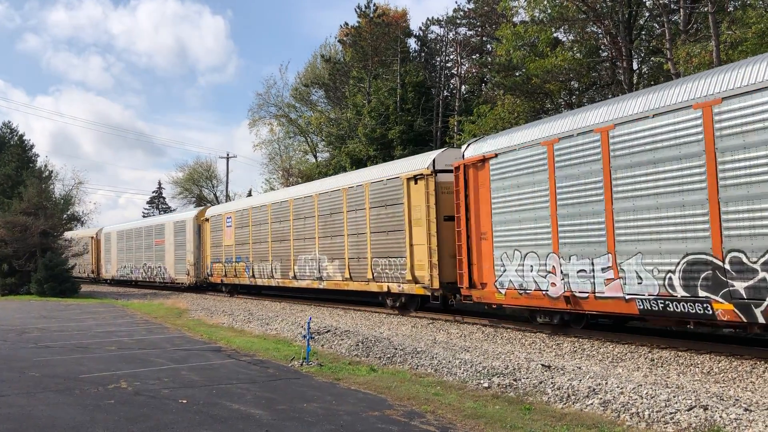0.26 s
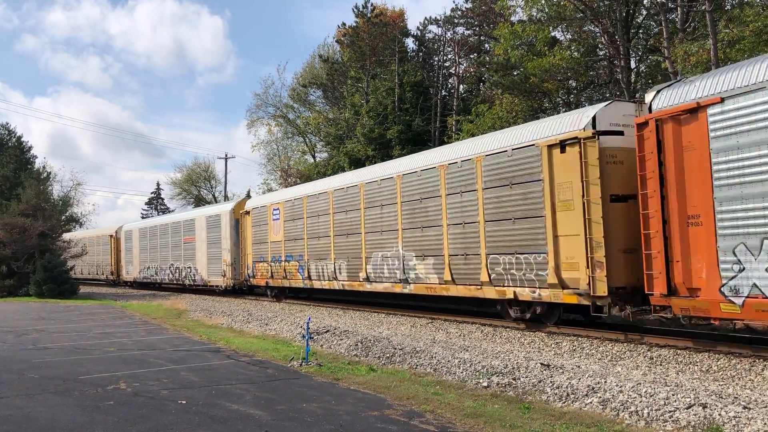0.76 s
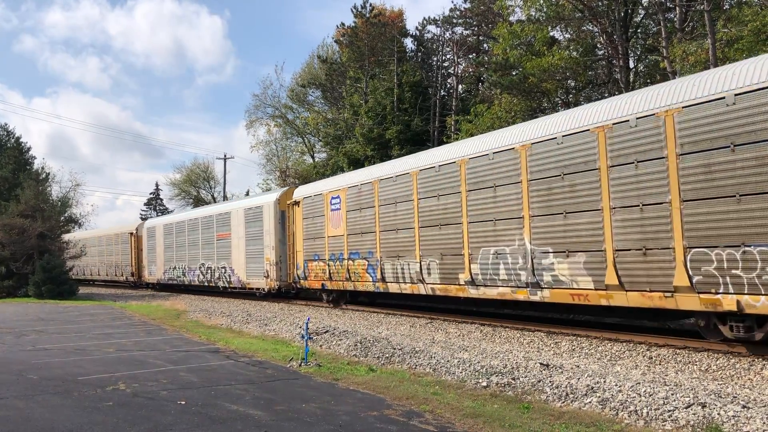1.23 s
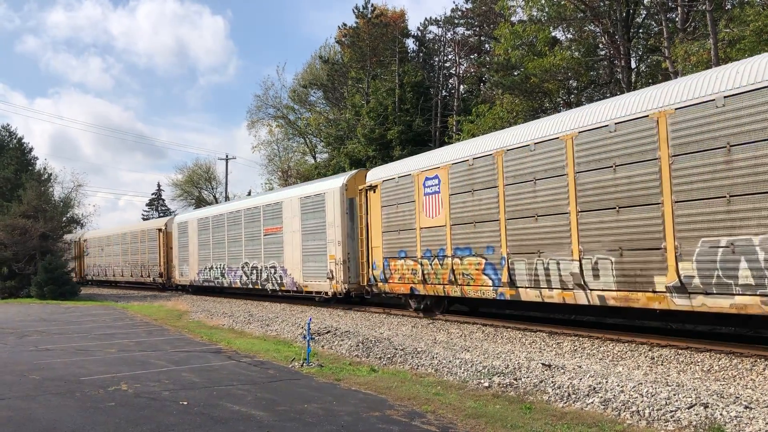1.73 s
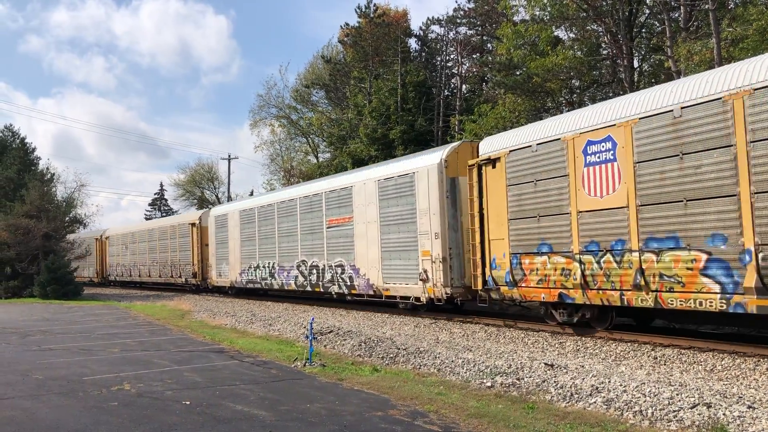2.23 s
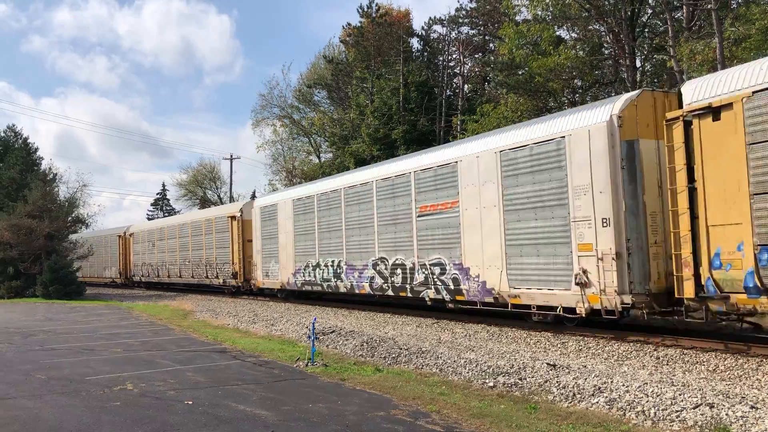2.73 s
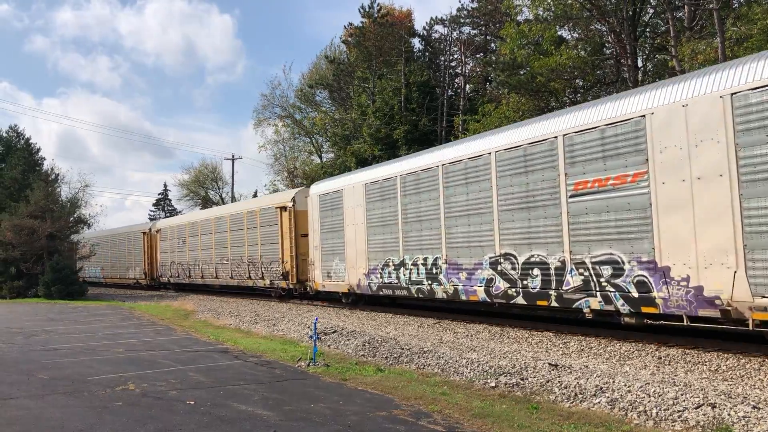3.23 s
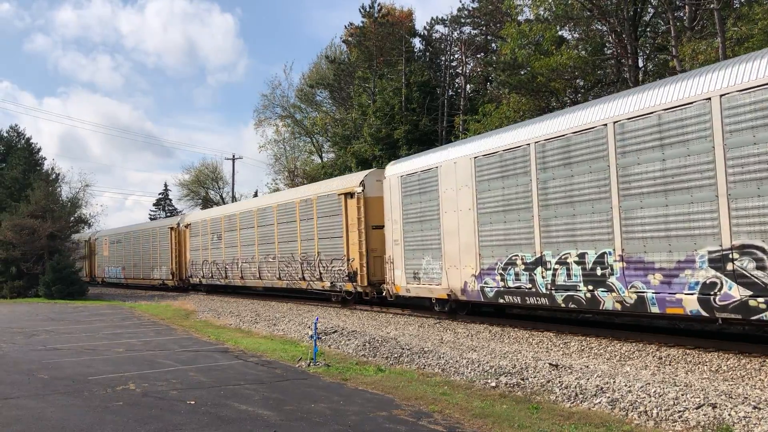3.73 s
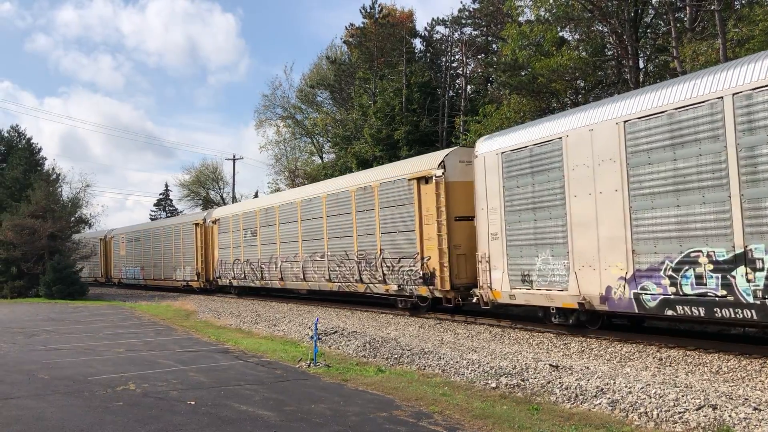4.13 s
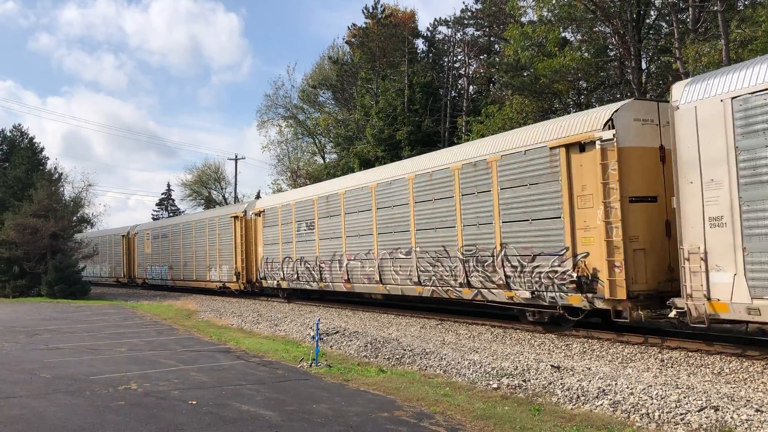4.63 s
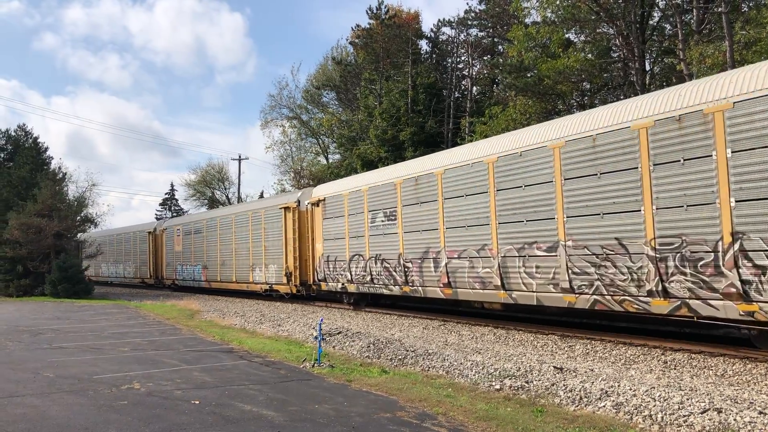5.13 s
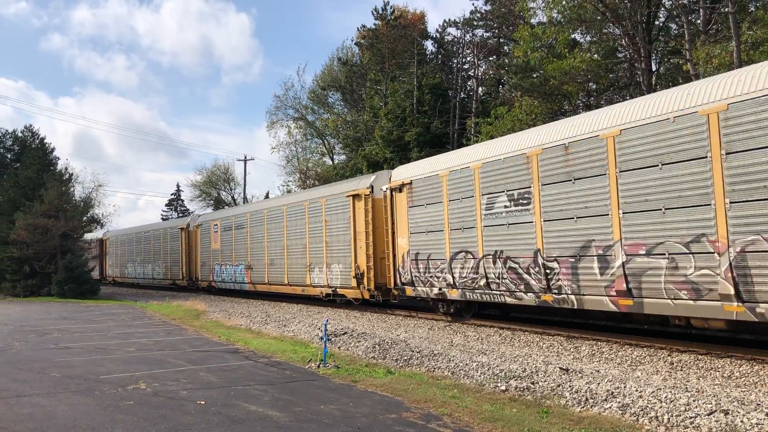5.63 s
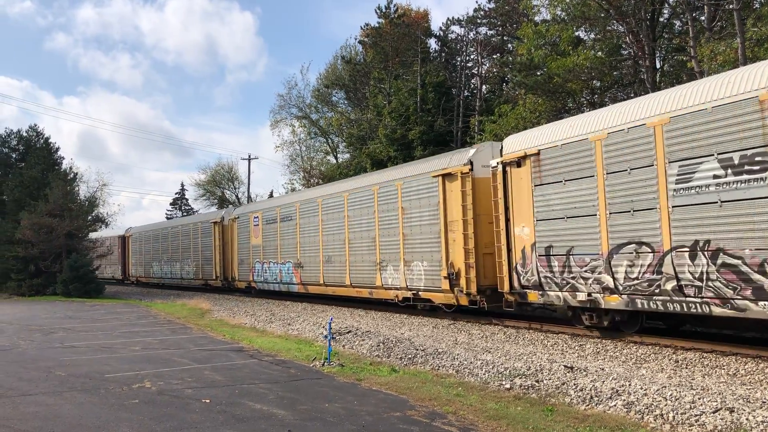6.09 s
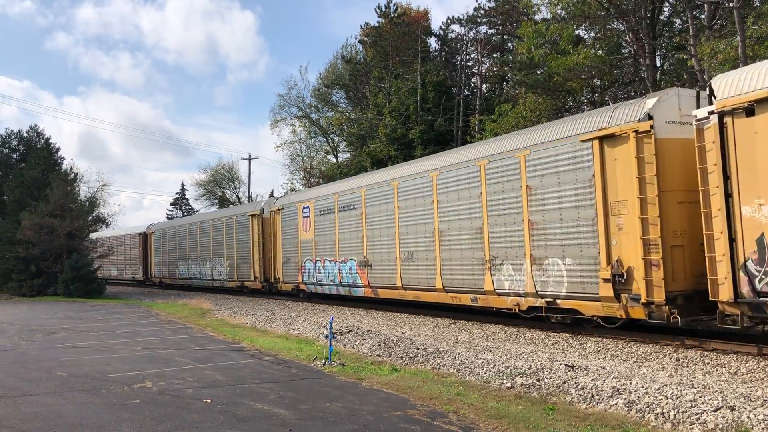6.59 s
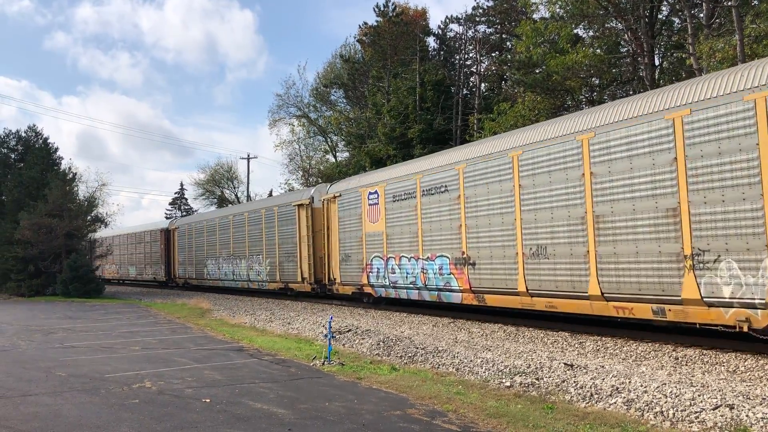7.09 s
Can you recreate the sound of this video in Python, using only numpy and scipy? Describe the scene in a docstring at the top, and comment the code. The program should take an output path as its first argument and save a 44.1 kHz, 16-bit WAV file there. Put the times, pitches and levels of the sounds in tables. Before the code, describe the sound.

A freight train is already passing close by outdoors, heard in mono from a fixed trackside position. From 0 to 1.2 s, deep wagon rumble and gritty rail noise mix with hissing flange scrape, brief chirps and a stuttering high squeal; a bright metallic strike rings at 0.3 s. Around 1.2 to 1.7 s a still higher squeal enters, with more knocks and a ringing ping. From 2 to 3.9 s the rumble eases while the main piercing squeal swells, gliding down in pitch, with a hoarse second tone above it. It drops sharply after 4 s. High squeals flare at 4.4 and 4.8 to 5 s, with a crash at 5 s and small strikes near 5.4 s. Squealing then thins, scraping dips around 6 s, and rumble rises. A ringing strike at 6.4 s precedes renewed scraping, faint whistles and a fading shrill tone until about 7.4 s, the train still rolling.

```python
"""Wheels of a long freight train squeal round a curve: stick-slip locks each onto one mode, as a gliding tone,
and a random sum of Doppler-shifted echoes from wagon sides and trees gives it a hoarse halo.
Flanges scrape and strike the rail: shaped noise with a shared judder, and decaying rings.
Wagons, bogies and rail rumble as shaped noise; far wheels whistle faintly. Outdoors, mono."""
import sys
import numpy as np
from scipy import signal
from scipy.fft import rfft, irfft, next_fast_len
from scipy.io import wavfile
from scipy.ndimage import uniform_filter1d, map_coordinates

SR = 44100
rng = np.random.default_rng(int(sys.argv[2]) if len(sys.argv) > 2 else 0)


def store_wav(level_fs):
    """Save 16-bit WAV to argv[1]."""
    pcm = np.round(np.clip(np.atleast_2d(level_fs), -1, 1) * 32767)
    wavfile.write(sys.argv[1], SR, pcm.T.astype(np.int16))


N = 324135

# long squeals, before gain and waver: time_s, level_db
LOW_SQUEAL = [(0, -30.5), (.7, -28.5), (1.9, -24), (3, -19.5), (3.8, -14), (4.2, -26.5), (4.38, -36),
              (5.05, -33.5), (5.9, -45)]
MID_SQUEAL = [(1.6, -40), (2.0, -33), (2.72, -23.5), (3.25, -25.5), (3.52, -19), (3.78, -25.5),
              (4.18, -22.5), (5.0, -32), (6.1, -44)]
HIGH_SQUEAL = [(1.22, -32.5), (1.33, -24.5), (2.0, -20.5), (2.6, -26.5), (3.7, -30), (4.42, -19),
               (4.62, -23.5), (4.76, -16.0), (5.03, -18.5), (5.2, -25.5), (5.85, -21.5), (6.05, -27.5),
               (6.7, -24), (7.35, -33)]
# pitch of the mid and high squeals, which drops and nearly holds by turns: time_s, pitch_hz
MID_GLIDE_HZ = [(3.6, 7535), (3.9, 7470), (4.3, 7412), (5.2, 7403)]
HIGH_GLIDE_HZ = [(1.22, 8870), (1.45, 8820), (1.6, 8745), (5, 8738), (5.2, 8695), (5.45, 8597)]
# low squeal catches hard and flares: start_s, length_s, extra_db
CATCHES = [(.02, .07, 6.5), (.34, 0.028, 7), (.82, 0.088, 6.5), (.99, .09, 6.5), (1.32, 0.12, 4.5),
           (1.55, 0.056, 8), (1.69, 0.058, 6), (2.42, 0.077, 7), (2.8, 0.036, 4.5), (2.96, 0.066, 6)]
# brief squeals of other wheels: start_s, length_s, first_pitch_hz, level_db
CHIRPS = [(-.03, .13, 7680, -25.5), (-.03, .17, 13190, -27), (.096, .18, 3920, -23.5),
          (.326, 0.22, 4000, -27.5), (.569, 0.31, 3890, -22.5), (.95, 1, 8440, -41),
          (1.252, 0.14, 6330, -28), (1.35, 0.29, 3620, -26.5), (1.5, 0.069, 3268, -28),
          (1.656, 0.091, 4282, -29.5), (1.67, .25, 7310, -34), (3.333, 0.26, 6435, -32),
          (3.68, .24, 13640, -28), (3.7, .3, 15720, -31), (3.83, .32, 13510, -23), (2.198, .6, 7840, -35),
          (3.3, 0.39, 3880, -32), (3.87, 0.72, 6380, -30.5), (4.76, .3, 3830, -28),
          (4.87, .13, 1523, -36.5), (4.95, .24, 3805, -24), (5.02, .4, 14400, -41),
          (5.07, .12, 6225, -25.5), (5.15, 0.93, 6210, -37), (5.051, .85, 5060, -39),
          (5.18, 0.49, 3800, -36), (6.65, 0.89, 5300, -38), (6.805, 0.71, 4040, -42.5),
          (6.95, 0.88, 5690, -40), (7.03, .67, 14750, -30)]
# stuttering wheel mode: time_s, pitch_hz, level_db
SQUEAK = [(1.7, 3956, -56), (2.2, 3960, -35), (2.75, 3940, -35), (3.45, 3916, -37), (4.2, 3820, -30.5),
          (4.35, 3960, -55), (5.6, 3780, -44), (5.9, 3730, -62)]
# deeper stuttering mode, before the scrapes change it: time_s, level_db
DEEP_SQUEAK = [(0, -45.5), (2.4, -44), (3.5, -39.5), (4.95, -40), (5.25, -48)]
# flanges on the rail, before band offsets: time_s, pressure_db, hiss_db
FLANGES = [(0, -20.5, -20), (1, -17, -20), (1.9, -19.5, -19), (3.45, -20.5, -19), (3.58, -23.5, -23),
           (3.95, -19, -18), (4.35, -24, -22), (5.05, -23, -23), (5.7, -26.5, -26), (6, -30.5, -30.5),
           (6.38, -29, -28.5), (6.6, -23.5, -22), (7.35, -25.5, -23)]
# short changes in flange scraping, mostly louder: start_s, length_s, change_db
SCRAPES = [(0.047, 0.098, 3.5), (.3, 0.18, 3.5), (.56, 0.14, 4), (1.24, 0.34, 2), (2.703, 0.044, 0.5),
           (3.08, 0.084, 1), (3.435, .045, 3.5), (4.426, 0.056, -0.5), (4.744, .06, 3), (4.878, 0.082, 4)]
# broad modes of a rubbed wheel: mode_hz, width_hz, relative_db
WHEEL_MODES = [(2670, 75, -24), (3850, 220, -9), (5060, 170, -2), (5064, 310, 0.5), (6260, 200, -7),
               (7610, 400, -3.5), (8700, 390, -5.5), (9900, 190, -7), (11200, 580, -11)]
# level of the rubbed wheels' ringing, before judder: time_s, level_db
RINGING = [(0, -27.5), (1.1, -28), (1.6, -24), (2.6, -20.5), (3.5, -21), (4.2, -24.5), (5, -31.5),
           (5.6, -35.5), (6.1, -45), (7.35, -36.5)]
# flange strikes: start_s, crash_db, ring_hz, ring_db, ring_t60_s
STRIKES = [(0.26, -18, 7450, -18, .15), (1.174, -32, 7600, -20, .05), (1.222, -25, 8500, -22.5, .07),
           (1.652, -26, 8480, -12.5, 0.15), (5.03, -18, 6900, -29, .2), (5.354, -21, 4100, -31, .1),
           (5.476, -26, 6840, -29, .2), (6.435, -37, 6810, -24.5, 0.97)]
# rolling noise, before part offsets: time_s, boom_db, bogie_db, rail_db
ROLLING = [(0, -21, -19.5, -21), (.3, -22, -21, -19), (.55, -26, -20, -18.5), (1.15, -22.5, -19.5, -19),
           (1.88, -22.5, -20, -22.5), (2.08, -25, -21.5, -24), (3, -29.5, -24, -25.5),
           (3.45, -26.5, -24.5, -25), (3.62, -33.5, -27.5, -30.5), (4.2, -32.5, -25, -25),
           (5.35, -27.5, -25.5, -25.5), (5.85, -24.5, -22, -23.5), (6.45, -24.5, -20, -20.5),
           (7.35, -24.5, -20.5, -21)]
# noise spectra of flange scrape, wagon bodies, bogies and rail: frequency_hz, relative_db_per_hz
GRIND_SPECTRUM = [(800, -14), (1400, -3), (2000, -2.5), (2450, 0.5), (2720, 0), (3000, 1), (4300, 1),
                  (5400, -11), (7000, -42)]
RASP_SPECTRUM = [(3500, -42), (4700, -4), (5700, 1.5), (6400, 3), (7000, 1), (8000, 0.5), (9200, -0.5),
                 (10300, 0), (12500, -40)]
HISS_SPECTRUM = [(7000, -42), (8800, -1), (10200, 1.5), (11200, 2), (12500, 1), (14500, 1.5), (16000, 0.5)]
BOOM_SPECTRUM = [(18, -50), (30, -31), (41, -17), (52, -10), (63, 1), (80, -4.5), (105, -6), (135, -17),
                 (250, -72)]
BOGIE_SPECTRUM = [(70, -50), (105, -16), (130, -0.5), (200, -0.5), (290, -1), (370, -7.5), (480, -20),
                  (900, -60)]
RAIL_SPECTRUM = [(250, -49), (400, -4.5), (500, -3), (660, 0.5), (850, -2.5), (1150, -7), (1500, -14),
                 (2000, -11.5), (2900, -20.5)]

# low squeal's wheel: pitch at rest, closest moment, speed, closest distance
LOW_HZ, PASS_S, SPEED_M_S, DISTANCE_M = 4968, 3.88, 13.8, 13.2
SOUND_M_S = 343
HOARSE_DB_PER_S = 12  # growth of its halo in the second after the pass
CHIRP_SAG_PER_S = .029  # share of first pitch lost per second
DEEP_HZ, DEEP_DB_PER_BITE_DB = 2707, 1.44
BITE_S, RELEASE_S = 0.031, 0.039  # onset and release of every scrape and catch
SURGES_PER_S, FIRST_SURGE_S, SURGE_DB = 6.88, .135, 0.72
GRIND_DB, RASP_DB, HISS_DB = -9.5, -9.5, -4  # offset from each level curve
GRIND_GROWTH, RASP_GROWTH = 0.82, 0.64  # dB per dB of pressure
GRIND_DB_PER_BITE_DB, RASP_DB_PER_BITE_DB, HISS_DB_PER_BITE_DB = 0.83, 1.6, 0.62
BOOM_DB, BOGIE_DB, RAIL_DB = -2.5, -4.5, -7  # offset from each rolling level
FAR_MIN_DB, FAR_RANGE_DB, FAR_LENGTH_S = -24.5, 4, 1.2  # levels against the hiss curve
FAR_LOW_HZ, FAR_HIGH_HZ = 3420, 15270
TOP_HZ = 15750


def amp(db):
    """Decibels to gain."""
    return 10 ** (np.asarray(db) / 20)


def unit(x):
    """Scale to rms 1."""
    return x / np.sqrt(np.mean(np.abs(x) ** 2) + 1e-20)


def curves(rows):
    """One value per sample for each column after the time."""
    time_s, *columns = np.transpose(rows)
    return [np.interp(np.arange(N) / SR, time_s, column) for column in columns]


def wobble(knots_per_s):
    """Smooth random curve."""
    knots = rng.standard_normal(int(N * knots_per_s / SR) + 4)
    coarse = np.arange(0, N + 16, 16)
    return np.interp(np.arange(N), coarse, map_coordinates(knots, [coarse * knots_per_s / SR]))


def grown(db, growth):
    """Scale a level curve's swings about its mean by growth."""
    return db.mean() + growth * (db - db.mean())


def flares(rows):
    """Level change in dB from start, length, dB rows: each sets in, holds and lets go."""
    t = np.arange(N) / SR
    total_db = np.zeros(N)
    for start_s, length_s, db in rows:
        end_s = start_s + length_s
        corners_s = [start_s - BITE_S, start_s, end_s, end_s + RELEASE_S]
        total_db += db * np.interp(t, corners_s, [0, 1, 1, 0])
    return total_db


def filtered(x, response):
    """Apply a gain that is a function of frequency."""
    size = next_fast_len(N + SR // 2)
    return irfft(rfft(x, size) * response(np.fft.rfftfreq(size, 1 / SR)), size)[:N]


def noise(spectrum):
    """Noise of rms 1 with a Hz, dB spectrum."""
    knot_hz, knot_db = np.transpose(spectrum)

    def response(hz):
        return amp(np.interp(np.log(hz + 1), np.log(knot_hz), knot_db, -120, -120))

    return unit(filtered(rng.standard_normal(N), response))


def steel(spectrum, patchy_db):
    """Noise in which narrow resonances of passing steel parts come and go."""
    bins = signal.stft(noise(spectrum), nperseg=1024)[2]
    patches = uniform_filter1d(rng.standard_normal(bins.shape), size=2, axis=0)
    patches = uniform_filter1d(patches, size=14, axis=1)
    return unit(signal.istft(bins * amp(patchy_db * unit(patches)), nperseg=1024)[1][:N])


def scatter(width_hz):
    """Random complex gain of rms 1: many paths, each with its own Doppler shift."""
    size = next_fast_len(N)
    shift_hz = np.fft.fftfreq(size, 1 / SR)
    paths = rng.standard_normal(size) + 1j * rng.standard_normal(size)
    return unit(np.fft.ifft(paths / (1 + (shift_hz / width_hz) ** 2))[:N])


def doppler():
    """Pitch factor of a wheel that rolls past at steady speed."""
    along_m = SPEED_M_S * (np.arange(N) / SR - PASS_S)
    return 1 / (1 + SPEED_M_S / SOUND_M_S * along_m / np.hypot(along_m, DISTANCE_M))


def squeal(levels, pitch_hz, gain_db, waver_db, flutter_db, fading, fading_hz, halo_db, halo_hz):
    """Stick-slip sustains one wheel mode; echoes off moving wagons make it fade and add a halo."""
    level_db = curves(levels)[0] + waver_db * np.tanh(wobble(19))  # the contact tightens and eases
    t = np.arange(N) / SR
    fade_in = np.clip((t - levels[0][0]) / .02, 0, 1)
    fade_out = np.clip((levels[-1][0] - t) / 0.077 + 1.5, 0, 1)
    slip = unit(wobble(45) + 1.16 * wobble(130))
    # friction caps the swing: it drops out but never spikes
    grip = unit(amp(-flutter_db * np.logaddexp(0, 2 * slip)))
    paths = unit(1 + fading * scatter(fading_hz)) + amp(halo_db) * scatter(halo_hz)
    tone = np.sqrt(2) * np.real(paths * np.exp(2j * np.pi * np.cumsum(pitch_hz) / SR))
    return amp(level_db + gain_db) * fade_in * fade_out * grip * tone


def low_squeal():
    """One wheel's mode, Doppler-shifted as it passes; its halo grows once it has gone by."""
    gone_s = np.clip(np.arange(N) / SR - PASS_S, 0, 1)
    tone = squeal(LOW_SQUEAL, LOW_HZ * doppler(), gain_db=-2.5, waver_db=1.3, flutter_db=3.5,
                  fading=0.15, fading_hz=25, halo_db=-15.5 + HOARSE_DB_PER_S * gone_s, halo_hz=170)
    return amp(flares(CATCHES)) * tone


def mid_squeal():
    """Stick-slip on a higher mode that drops in pitch, with a strong halo."""
    return squeal(MID_SQUEAL, curves(MID_GLIDE_HZ)[0], gain_db=-3.5, waver_db=2.5, flutter_db=1.5,
                  fading=.4, fading_hz=25, halo_db=-0.5, halo_hz=150)


def high_squeal():
    """Stick-slip on the highest of the three long modes, dropping in pitch twice."""
    return squeal(HIGH_SQUEAL, curves(HIGH_GLIDE_HZ)[0], gain_db=-2.5, waver_db=3, flutter_db=1.5,
                  fading=0.4, fading_hz=22, halo_db=-3.5, halo_hz=191)


def chirps():
    """Other wheels catch for a moment, sag in pitch and let go."""
    out = np.zeros(N)
    paths = unit(1 + 0.49 * scatter(35) + 0.68 * scatter(110))
    for start_s, length_s, first_hz, level_db in CHIRPS:
        span = np.arange(max(0, int(start_s * SR)), min(N, int((start_s + length_s) * SR)))
        progress = np.clip((span / SR - start_s) / length_s, 0, 1)
        pitch_hz = first_hz * (1 - CHIRP_SAG_PER_S * length_s * progress)
        phase = 2 * np.pi * np.cumsum(pitch_hz) / SR
        catch = np.sqrt(np.abs(np.sin(np.pi * np.sqrt(progress))))
        swell = catch * np.sqrt(1 - progress ** 2)  # catches fast, lets go slowly
        own_paths = paths[(span + rng.integers(N)) % N]
        out[span] += amp(level_db) * np.sqrt(2) * swell * np.real(own_paths * np.exp(1j * phase))
    return out


def stutter(pitch_hz, level_db, catches_per_s, width_hz):
    """A wheel mode that keeps catching and slipping in short squeaks."""
    pitch_hz = pitch_hz * (1 + 0.00797 * wobble(14))  # the pitch wanders slightly
    caught = unit(1 + 1.07 * np.tanh(0.78 * wobble(catches_per_s) - .3))
    paths = unit(1 + 0.91 * scatter(width_hz))
    tone = np.sqrt(2) * np.real(paths * np.exp(2j * np.pi * np.cumsum(pitch_hz) / SR))
    return amp(level_db) * caught * tone


def squeaks(bite_db):
    """Two stuttering wheel modes; the deeper one's level follows the scrapes."""
    squeak = stutter(*curves(SQUEAK), catches_per_s=40, width_hz=76)
    deep_db = curves(DEEP_SQUEAK)[0] + DEEP_DB_PER_BITE_DB * bite_db
    return squeak + stutter(DEEP_HZ, deep_db, catches_per_s=44, width_hz=89)


def bites():
    """Friction change in dB: the scrapes, over a slight regular surge."""
    t = np.arange(N) / SR
    return flares(SCRAPES) + SURGE_DB * np.cos(2 * np.pi * SURGES_PER_S * (t - FIRST_SURGE_S))


def wheel_response(hz):
    """Broad resonances of a rubbed wheel, summed in power."""
    power = 0
    for mode_hz, width_hz, db in WHEEL_MODES:
        power = power + (amp(db) / (1 + ((hz - mode_hz) / width_hz) ** 2)) ** 2
    return np.sqrt(power)


def scraping(press_db, hiss_db, bite_db):
    """Flanges grab and slip on the rail; one judder drives the scrape and the wheels' ringing."""
    judder = unit(np.tanh(0.19 * (wobble(20) + 0.96 * wobble(70))))  # friction caps the surges
    grind_db = grown(press_db, GRIND_GROWTH) + GRIND_DB + GRIND_DB_PER_BITE_DB * bite_db
    grind_db = grind_db + 1.28 * judder + 0.61 * wobble(45)
    rasp_db = grown(press_db, RASP_GROWTH) + RASP_DB + RASP_DB_PER_BITE_DB * bite_db + 1.5 * judder
    top_db = hiss_db + HISS_DB + HISS_DB_PER_BITE_DB * bite_db + 1.05 * judder
    grind = amp(grind_db) * steel(GRIND_SPECTRUM, patchy_db=2.5)
    rasp = amp(rasp_db) * steel(RASP_SPECTRUM, patchy_db=3.5)
    hiss = amp(top_db) * steel(HISS_SPECTRUM, patchy_db=3.0)
    ringing_db = curves(RINGING)[0] + 1.36 * judder
    ringing = amp(ringing_db) * unit(filtered(rng.standard_normal(N), wheel_response))
    return grind + rasp + hiss + ringing


def strikes():
    """A flange hits the rail: a bright crash, and one wheel mode rings on."""
    out = np.zeros(N)
    crash_noise = noise(RASP_SPECTRUM)
    paths = unit(1 + 0.62 * scatter(90))
    for start_s, crash_db, ring_hz, ring_db, t60_s in STRIKES:
        span = np.arange(round(start_s * SR), N)
        t = np.arange(len(span)) / SR
        crash = amp(crash_db - 60 * t / 0.23) * crash_noise[span]  # t60 0.23 s
        ring = amp(ring_db - 60 * t / t60_s) * np.real(paths[span] * np.exp(2j * np.pi * ring_hz * t))
        out[span] += (1 - np.exp(-t / .001)) * (crash + ring)
    return out


def rolling():
    """Rough treads shake the wagon bodies, the bogies and the rail."""
    boom_db, bogie_db, rail_db = curves(ROLLING)
    boom = amp(boom_db + BOOM_DB + 0.41 * wobble(6)) * noise(BOOM_SPECTRUM)
    bogies = amp(bogie_db + BOGIE_DB) * noise(BOGIE_SPECTRUM)
    rail = amp(rail_db + RAIL_DB + 0.74 * wobble(14)) * steel(RAIL_SPECTRUM, patchy_db=1.6)
    return boom + bogies + rail


def far_wheels(hiss_db, count):
    """Wheels further round the curve whistle faintly, each at a steady pitch."""
    out = np.zeros(N)
    paths = unit(1 + 0.72 * scatter(16))
    for when, height, strength, route in rng.random((count, 4)):
        start_s = when * N / SR - FAR_LENGTH_S / 2
        span = np.arange(max(0, int(start_s * SR)), min(N, int((start_s + FAR_LENGTH_S) * SR)))
        t = span / SR - start_s
        pitch_hz = FAR_LOW_HZ * (FAR_HIGH_HZ / FAR_LOW_HZ) ** height
        own_paths = paths[(span + int(route * N)) % N]
        tone = np.real(own_paths * np.exp(2j * np.pi * pitch_hz * t))
        swell = np.sin(np.pi * t / FAR_LENGTH_S)
        out[span] += amp(FAR_MIN_DB + FAR_RANGE_DB * strength) * swell * tone
    return amp(hiss_db) * out


def scene():
    """The whole train, alike in both channels."""
    press_db, hiss_db = curves(FLANGES)
    bite_db = bites()
    train = low_squeal() + mid_squeal() + high_squeal() + chirps() + squeaks(bite_db)
    train += scraping(press_db, hiss_db, bite_db) + strikes()
    train += rolling() + far_wheels(hiss_db, count=30)
    return np.array([train, train])


def record(dry):
    """The recorder rounds off the tallest peaks and keeps nothing above its band limit."""
    rounded = dry / (1 + np.abs(dry / .75) ** 6) ** (1 / 6)
    return np.array([filtered(channel, lambda hz: hz < TOP_HZ) for channel in rounded])


dry = scene()
out = record(dry)
store_wav(out)
```